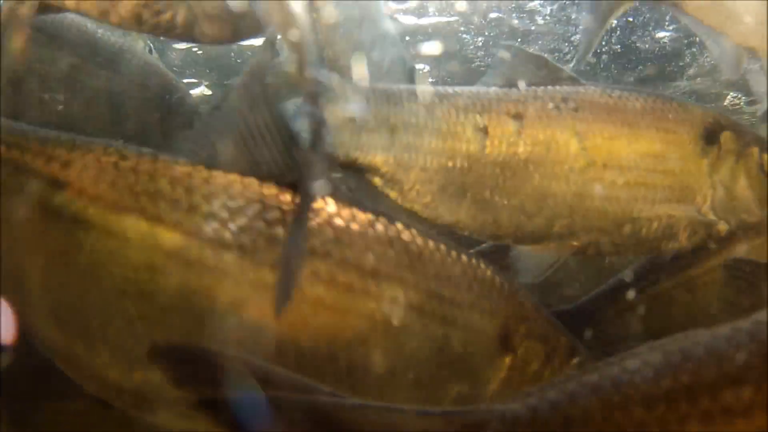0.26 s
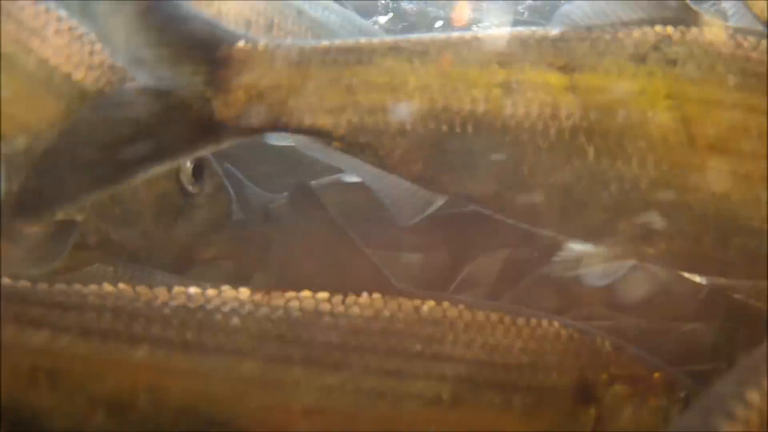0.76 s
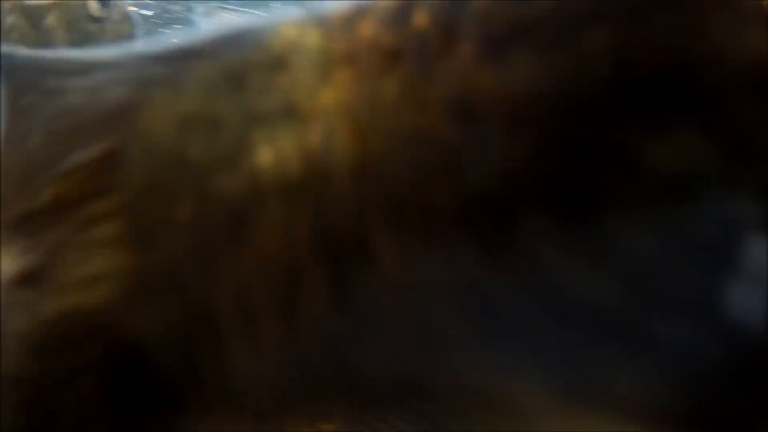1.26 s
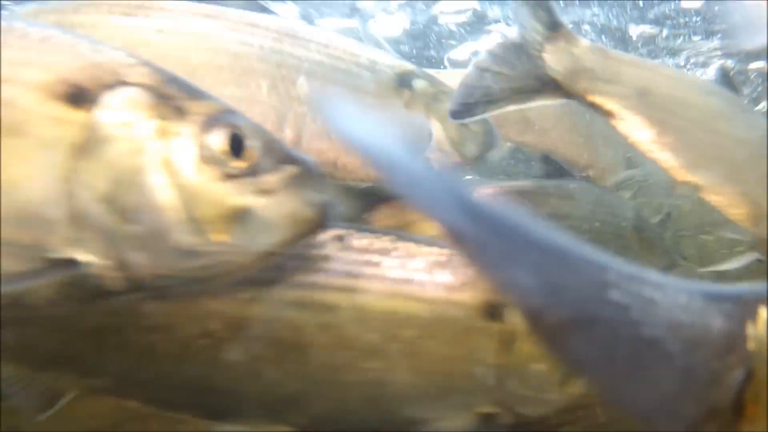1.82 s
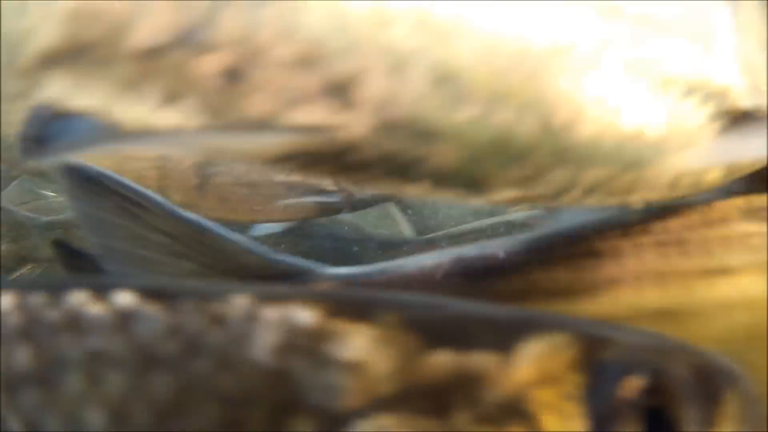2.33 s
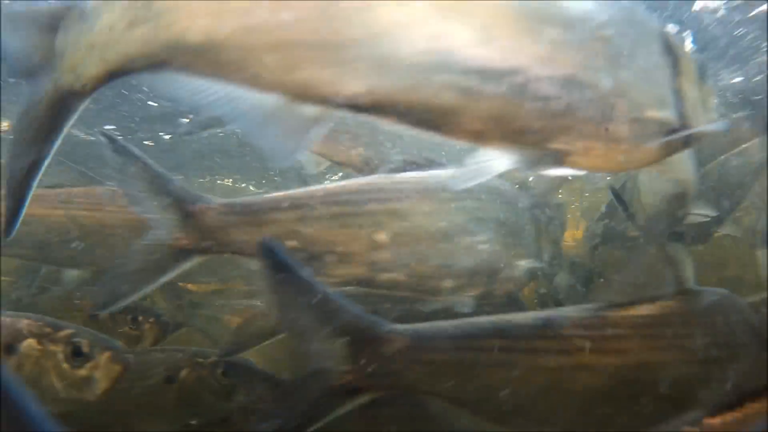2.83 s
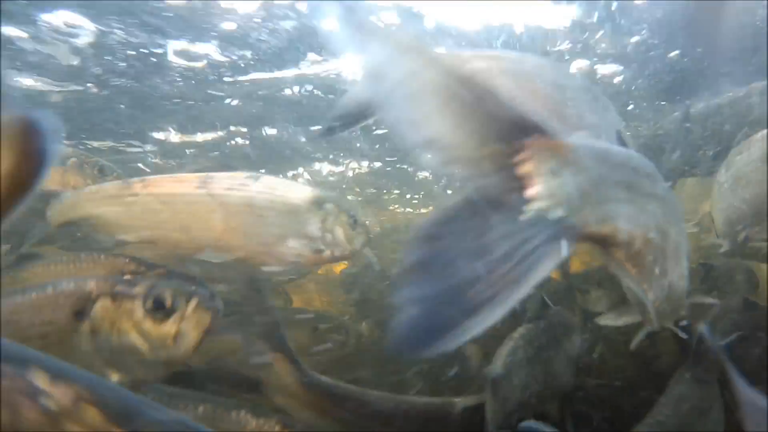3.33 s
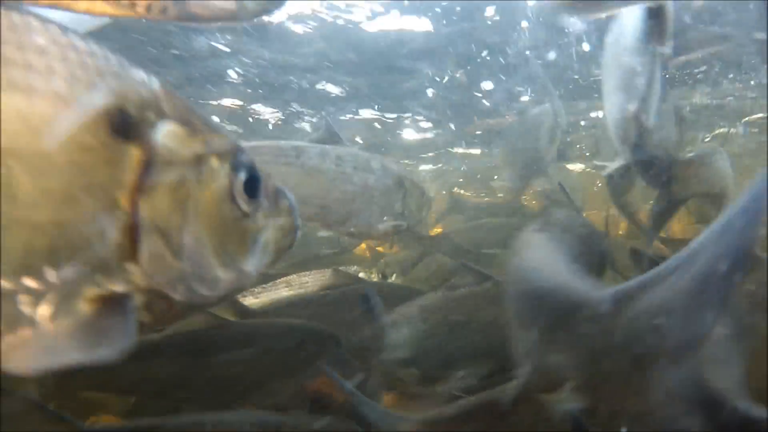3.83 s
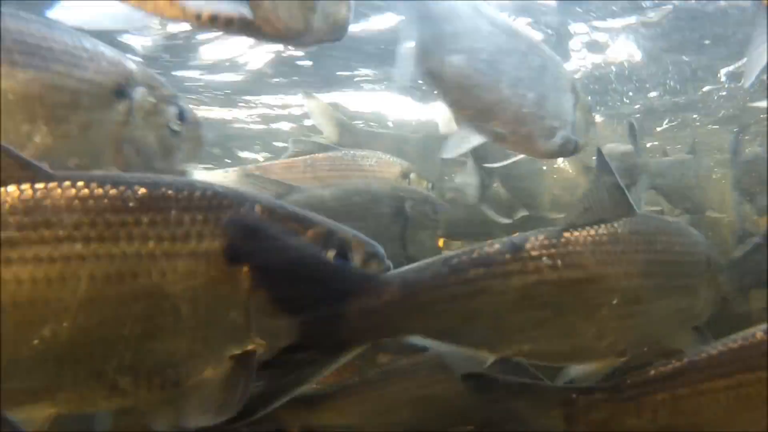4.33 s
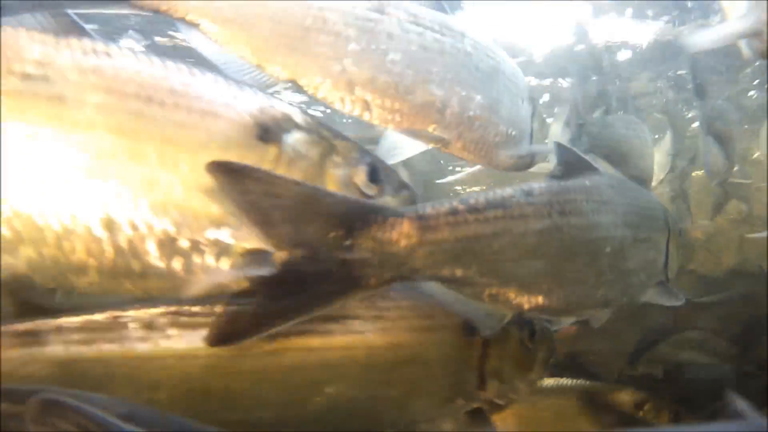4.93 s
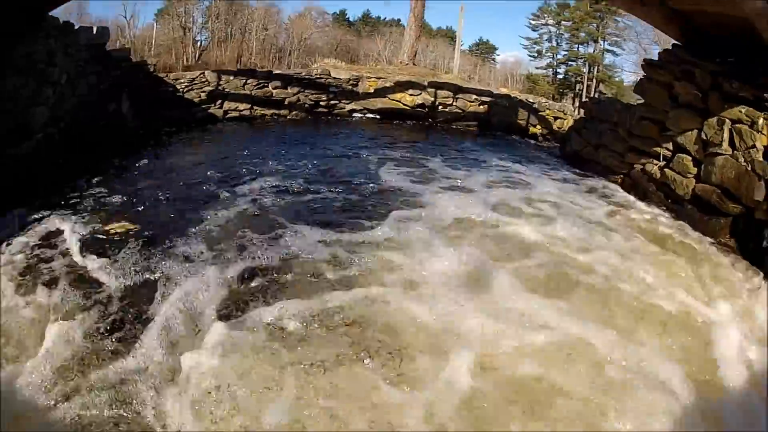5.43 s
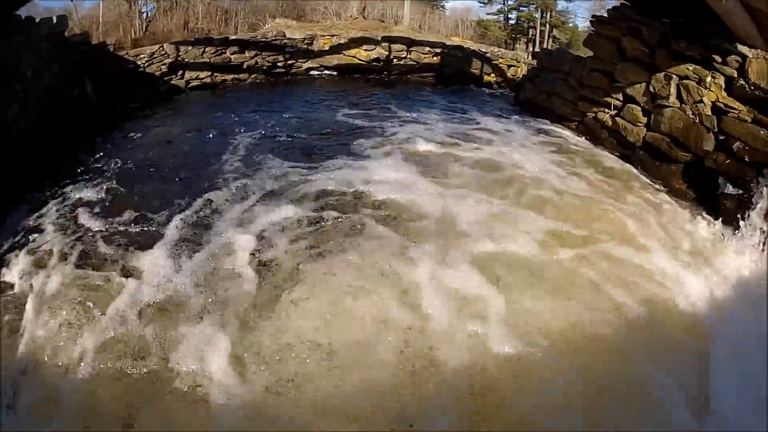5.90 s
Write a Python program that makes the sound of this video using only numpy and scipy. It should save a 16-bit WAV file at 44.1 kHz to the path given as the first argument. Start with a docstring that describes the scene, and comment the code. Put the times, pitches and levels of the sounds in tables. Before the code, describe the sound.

Close, boxy underwater sound: a sharp opening clunk, a pause, then clusters of overloaded knocks, raspy scrapes and deep mount thumps as fish crowd the microphone. The blows thin out into softer rubs, then very quiet dull flow with small rising bubble pops. Suddenly the sound opens to bright, fluttering, foamy water roar with slaps and light low buffeting.

```python
"""In a river, then above a weir: a sealed housing with a microphone inside sits in a dense run of fish.
Muffled current and bubble pops: filtered noise and gliding sines. Shoved mount: low modes and rumble.
Bodies scrape (rubbing noise, dense clicks) and knock (pressure pulses, wall ring, cracks) until it clips;
short high tones accompany these contacts.
The scene then changes to the air above the weir: flickering white-water noise, splashes and buffeting.
"""
import sys
import numpy as np
from scipy import signal
from scipy.fft import rfft, irfft
from scipy.io import wavfile
from scipy.ndimage import uniform_filter1d

SR = 44100
rng = np.random.default_rng(int(sys.argv[2]) if len(sys.argv) > 2 else 0)


def wav_record(signal):
    """Record a signal, one row per channel, as 16-bit PCM in the file named by sys.argv[1]."""
    frames = np.transpose(np.atleast_2d(signal))
    bounded = np.clip(frames, -1, 1)
    # unit amplitude maps onto the largest positive 16-bit level
    quanta = np.round(bounded * 32767).astype(np.int16)
    wavfile.write(sys.argv[1], SR, quanta)


N = 271656
TIME = np.arange(N) / SR
CUT_S = 5.216  # water to air


def undb(db):
    """Decibels to gain."""
    return 10 ** (np.asarray(db) / 20)


def unit(x):
    """Scale to rms 1."""
    return x / np.sqrt(np.mean(x ** 2) + 1e-18)


def add(out, start_s, x):
    """Mix x into out from start_s."""
    i = max(int(start_s * SR), 0)
    out[i:i + len(x)] += x[:N - i]


def colour(x, points, peaks=()):
    """Minimum-phase filter: (Hz, dB) outline plus resonances; keeps the power of white noise."""
    hz = np.arange(4097) * SR / 8192
    at_hz, at_db = np.transpose(points)
    db = np.interp(np.log(hz + 1), np.log(at_hz), at_db)
    for centre_hz, width_hz, lift_db in peaks:
        db = db + lift_db / (1 + (2 * (hz - centre_hz) / width_hz) ** 2)
    # fold the cepstrum to make the response causal
    cepstrum = irfft(np.log(undb(db)))
    cepstrum[1:4096] *= 2
    cepstrum[4097:] = 0
    response = irfft(np.exp(rfft(cepstrum)))
    return signal.fftconvolve(x, response / np.linalg.norm(response))[:len(x)]


def notch(x, hz, width_hz):
    """Remove one narrow band."""
    return signal.lfilter(*signal.iirnotch(hz, hz / width_hz, fs=SR), x)


def lowpass(x, hz, order):
    """Butterworth low-pass."""
    return signal.lfilter(*signal.butter(order, hz, fs=SR), x)


def fade(t, t60_s):
    """Exponential decay, 60 dB down after t60_s."""
    return np.exp(-np.log(1000) * t / t60_s)


def swell(start_s, rise_s, hold_s, t60_s):
    """Envelope: rises from start_s, starts to die away hold_s after start_s."""
    rise = np.clip((TIME - start_s) / rise_s, 0, 1)
    return rise * fade(np.maximum(TIME - start_s - hold_s, 0), t60_s)


def slide_pressure(length_s):
    """Contact envelope: builds fast, eases off."""
    return np.sin(np.pi * np.sqrt(np.linspace(0, 1, int(length_s * SR))))


def ring(hz, t60_s, glide=0):
    """One decaying sine, its pitch rising by the share glide over t60_s."""
    t = TIME[:int(t60_s * SR)]
    cycles = hz * t * (1 + glide * t / t60_s / 2)
    return np.sin(2 * np.pi * cycles) * fade(t, t60_s)


def walk(rate_hz):
    """Random levels held 1 / rate_hz and smoothed twice, rms 1."""
    k = int(SR / rate_hz)
    steps = np.repeat(rng.standard_normal(N // k + 1), k)
    return unit(uniform_filter1d(uniform_filter1d(steps, k), k)[:N])


def grains(rate_hz, spread_db):
    """Random clicks, rms 1; spread_db makes a few much larger than the rest."""
    hits = rng.random(N) < rate_hz / SR
    size_db = spread_db * np.minimum(rng.exponential(size=N), 4)
    return unit(hits * rng.standard_normal(N) * undb(size_db))


def churn(flicker_db, rate_hz):
    """Flat turbulent noise, rms 1, whose octaves swell and sink on their own."""
    spectrum = rfft(rng.standard_normal(N))
    hz = np.arange(N // 2 + 1) * SR / N
    octave = np.floor(np.log2(np.maximum(hz, 64)))
    out = np.zeros(N)
    for k in np.unique(octave):
        out += irfft(spectrum * (octave == k), N) * undb(flicker_db * walk(rate_hz))
    return unit(out)


def rumble(points):
    """Coloured low noise with its level evened out to rms 1."""
    x = colour(rng.standard_normal(N), points)
    return x / np.sqrt(uniform_filter1d(x ** 2, SR // 30) + 1e-12)


# bubbles popping nearby: start_s, level_db, start_pitch_hz
BUBBLE_POPS = [(1.424, -48, 1184), (3.087, -50, 844), (3.453, -51.5, 1103), (3.842, -46, 1172),
               (4.182, -50, 1995), (4.27, -55, 2700), (4.327, -43.5, 702), (4.331, -48.5, 2200),
               (5.18, -51, 3270)]
# current outline: freq_hz, relative_db_per_hz
CURRENT_SPECTRUM = [(15, -34.5), (25, -3.5), (87, -2), (114, -4), (180, -4.5), (384, -19), (659, -24.5),
                    (1020, -30.5), (2220, -28), (2480, -32.5), (5000, -35), (6050, -39), (8360, -38),
                    (14400, -45.5), (16000, -57)]
CURRENT_DB = -53


def current(bubble_t60_s=0.02, froth_gain=0.37):
    """Muffled turbulent flow with faint fizz; bubble pops are short sines gliding up."""
    flow = churn(flicker_db=-0.98, rate_hz=20) + undb(-9.5) * grains(rate_hz=250, spread_db=3)
    # centre_hz, width_hz, lift_db
    peaks = [(675.0, 160, 9.3), (2200, 270, 3.06), (3347, 510, 4.7)]
    out = undb(CURRENT_DB) * unit(colour(flow, CURRENT_SPECTRUM, peaks))
    for start_s, level_db, pitch_hz in BUBBLE_POPS:
        add(out, start_s, undb(level_db) * ring(pitch_hz, bubble_t60_s, glide=0.081))
        # each pop sheds four bubbles, smaller or larger
        for late, size in rng.random((4, 2)):
            shed = ring(pitch_hz * 2 ** (1.5 * size - 0.5), bubble_t60_s / 2)
            add(out, start_s + 0.011 * late, froth_gain * undb(level_db) * shed)
    return out


# air resonances in the housing: centre_hz, width_hz, lift_db
CAVITY_MODES = [(885, 120, 7), (1330, 190, -0.5), (2170, 610, 7), (3300, 700, 3.5), (8620, 670, 5)]
# rush outline: freq_hz, relative_db_per_hz
RUSH_SPECTRUM = [(60, -10), (160, -11), (290, -1), (410, -5), (600, -13), (900, -5), (2650, -10.5),
                 (3480, -5), (5300, -13.3), (8660, -14), (11000, -19), (11900, -43), (13500, -19),
                 (15500, -19)]
# water slapping down at the weir foot: start_s, length_s, slap_db, buffet_db
SPLASH_EVENTS = [(5.367, 0.02, -41, -67), (5.402, 0.094, -33.5, -35), (5.782, 0.067, -33.5, -49)]
# splash outline: freq_hz, relative_db_per_hz
SPLASH_SPECTRUM = [(100, -19), (300, 7), (600, -1), (1400, 4.5), (3000, -12), (8000, -26), (16000, -12)]
# low buffeting outline: freq_hz, relative_db_per_hz
BUFFET_SPECTRUM = [(20, -11), (50, -1.5), (85, 2), (140, -9), (250, -22), (500, -63)]
RUSH_DB, RUSH_START_DB, RUSH_RISE_S = -35.5, -3.5, 0.14  # start is relative to the steady rush
BUFFET_DB, GUST_DB, GUSTS_HZ = -49, 0.5, 10
SPRAY_DB, SURGE_RISE_S, SURGE_T60_S = -12, 0.016, 0.19


def weir():
    """Bursting bubbles rush as noise; splashes add spray, clicks and surges of low mount buffeting."""
    start_share = np.clip(1 - (TIME - CUT_S) / RUSH_RISE_S, 0, 1)
    flow = undb(RUSH_DB + RUSH_START_DB * start_share)
    heave = undb(BUFFET_DB + GUST_DB * walk(GUSTS_HZ)) * (flow / undb(RUSH_DB)) ** 2
    slaps = np.zeros(N)
    for start_s, length_s, slap_db, buffet_db in SPLASH_EVENTS:
        add(slaps, start_s, undb(slap_db) * slide_pressure(length_s))
        heave += undb(buffet_db) * swell(start_s, SURGE_RISE_S, length_s, SURGE_T60_S)
    foam = churn(flicker_db=1.45, rate_hz=18) + undb(-5.0) * grains(rate_hz=2300, spread_db=2.5)
    rush = unit(colour(foam, RUSH_SPECTRUM, CAVITY_MODES)) * (flow + undb(SPRAY_DB) * slaps)
    splashes = colour(slaps * grains(rate_hz=1700, spread_db=0), SPLASH_SPECTRUM, CAVITY_MODES)
    return rush + splashes + rumble(BUFFET_SPECTRUM) * heave


# passing bodies shoving the mount: start_s, level_db
MOUNT_SHOVES = [(0.058, -42.5), (0.45, -35.5), (0.8, -36.5), (1.308, -27.5), (1.64, -35.5), (2.26, -43.5)]
# mount resonances: freq_hz, relative_db, t60_s
MOUNT_RESONANCES = [(48.37, -1, 1.3), (84, 5, 0.5), (122, -0.5, 0.35)]
# shudder outline: freq_hz, relative_db_per_hz
SWAY_SPECTRUM = [(20, -10), (50, -2.5), (85, -1.5), (130, -13), (220, -25), (500, -67.5)]
SHOVE_RISE_S, SHOVE_T60_S = 0.025, 0.98


def sway(shudder_db=-2):
    """Each shove excites decaying mount modes and a low noisy shudder."""
    shudder, modes = np.zeros((2, N))
    for start_s, level_db in MOUNT_SHOVES:
        shudder += undb(level_db) * swell(start_s, SHOVE_RISE_S, SHOVE_RISE_S, SHOVE_T60_S)
        for hz, mode_db, t60_s in MOUNT_RESONANCES:
            tone = np.sin(2 * np.pi * hz * (TIME - start_s))
            modes += undb(level_db + mode_db) * tone * swell(start_s, SHOVE_RISE_S, SHOVE_RISE_S, t60_s)
    return rumble(SWAY_SPECTRUM) * shudder * undb(shudder_db) + modes


# thin high tones near 11-13 kHz that accompany contacts: freq_hz, relative_db, t60_s
HIGH_TONES = [(11380, -0.5, .028), (12200, -1.5, 0.012), (12240, 2, 0.019), (12900, -2, 0.03)]


def high_tones(x):
    """Short high tones that follow x: x convolved with decaying sines."""
    return sum(undb(db) * signal.fftconvolve(x, ring(hz, t60_s))[:N] for hz, db, t60_s in HIGH_TONES)


# bodies, scales and fins sliding over the housing: start_s, length_s, rub_db, wall_ring_db, rasp_db
SCRAPE_EVENTS = [(0.171, 0.2, -40.5, -49.5, -61.5), (0.449, 0.045, -32, -59, -59),
                 (0.504, 0.17, -42, -64, -60.5), (0.669, 0.0092, -42, -29, -31.5),
                 (0.755, 0.023, -15, -26, -39), (1.187, 0.19, -60, -50.5, -67.5),
                 (1.243, 0.023, -51, -29.5, -52.5), (1.313, 0.0031, -35, -38.5, -51.5),
                 (1.324, 0.04, -25, -37.5, -41.5), (1.37, 0.012, -30, -55, -42.5),
                 (1.526, 0.029, -33, -38.5, -39.5), (1.566, 0.014, -37, -33.5, -40),
                 (1.646, 0.034, -34, -28.5, -32), (2.239, 0.11, -32, -52, -81),
                 (2.371, 0.033, -43, -72, -76), (2.57, 0.05, -49, -54.5, -74),
                 (2.599, 0.038, -42, -46, -56)]
# rub outline: freq_hz, relative_db_per_hz
RUB_SPECTRUM = [(25, -2), (65, 2.5), (125, -1), (230, -9.5), (500, -21), (1000, -37), (3000, -62)]
# contact crack and rasp outline: freq_hz, relative_db_per_hz
CRACK_SPECTRUM = [(300, -15), (1200, 8), (2200, 4), (3700, -1), (5000, -6.5), (7500, -11), (10000, -6.5),
                  (14500, -11), (16000, -16)]


def scrapes(wall_hz=705, wall_t60_s=0.021, wall_top_hz=1700, tone_db=-42):
    """Soft flanks rub with a rumble; scales catch and slip in dense clicks that rasp and ring the wall."""
    rub, wall, rasp = np.zeros((3, N))
    for start_s, length_s, rub_db, ring_db, rasp_db in SCRAPE_EVENTS:
        pressure = slide_pressure(length_s)
        add(rub, start_s, undb(rub_db) * pressure)
        add(wall, start_s, undb(ring_db) * pressure)
        add(rasp, start_s, undb(rasp_db) * pressure)
    slips = grains(rate_hz=5800, spread_db=2.0)
    mode = ring(wall_hz, wall_t60_s)  # damped by the body lying against it
    ringing = signal.fftconvolve(slips * wall, mode / np.linalg.norm(mode))[:N]
    body = lowpass(rub * rumble(RUB_SPECTRUM) + ringing, wall_top_hz, order=2)
    rasping = colour(slips * rasp, CRACK_SPECTRUM, CAVITY_MODES)
    return body + rasping + high_tones(slips * wall * undb(tone_db))


# fish striking the housing: start_s, push_db, contact_ms, wall_ring_db, wall_ring_hz (unsagged), crack_db
KNOCK_EVENTS = [(0.0511, 13, 2.9, 3, 907, -14), (0.069, 1, 3.4, -18.5, 990, -36),
                (0.0829, 0.5, 2.85, -21, 990, -46), (0.1, 3, 3.4, -18.5, 950, -37.5),
                (0.1183, 1, 3.3, -27, 990, -50), (0.1836, -13.5, 4.4, -41, 780, -56),
                (0.4368, -1.5, 3.3, -22, 854, -32), (0.4566, -6, 4.45, -42, 640, -48),
                (0.646, -26, 2.3, -26.5, 725, -38.5), (0.669, -18, 4.7, -11, 860, -27),
                (0.7414, 10, 4.78, -14, 900, -16.5), (0.7621, -7.5, 2.3, -11.5, 885, -30),
                (0.7799, 6, 3.24, -9, 775, -27), (0.8075, 4.5, 3.54, -16.5, 890, -25.5),
                (0.8271, 11, 3.85, -3, 860, -24), (0.8415, 11, 3.9, -3.5, 887, -18.5),
                (0.8557, 0.5, 5.3, -19.5, 905, -32), (0.872, 0, 5.35, -19.5, 895, -29.5),
                (0.9036, 7.5, 2.66, -7, 854, -29), (0.9917, 6.5, 2.92, 10, 810, -7),
                (1.0116, -14.5, 3.1, -0.8, 760, -20.5), (1.0306, -21, 2.2, -7.5, 750, -28.5),
                (1.2793, 8, 3, 3.5, 915, -11.5), (1.3257, -4, 2.4, -8.5, 940, -20.5),
                (1.3813, -2.5, 2.04, 4.5, 720, -15.5), (1.5599, -2.5, 3.45, -19.5, 980, -26),
                (1.6258, 9, 4, -3.5, 817, -10.5), (1.6486, 11, 2.66, -3, 698, -3),
                (2.241, -3, 6.8, -11, 680, -78), (2.35, -42, 1.7, -18, 816, -54),
                (2.608, -28.5, 1.43, -54, 700, -54)]
# wall resonances: multiple_of_ring_hz, relative_db, t60_s
WALL_RESONANCES = [(1, -3, 0.02), (0.95, -20.5, 0.047)]
WALL_SAG_MAX, LIFT_OFF_S = 0.2, 0.0043  # share of pitch; time constant


def knocks(leak_hz=119, leak_q=0.71, soft_hz=950, wall_top_hz=1650, rise_share=0.04,
           crack_t60_s=0.02, crack_rise_s=0.00024, tone_push_db=-41, tone_ring_db=-33):
    """Blows squeeze the housing, ring the wall, add short high tones, crack; hard ones sag the pitch."""
    pushes, walls, cracks, jolts = np.zeros((4, N))
    t = TIME[:SR // 20]
    for start_s, push_db, contact_ms, ring_db, ring_hz, crack_db in KNOCK_EVENTS:
        contact = t / (contact_ms / 1000)
        push = np.sin(np.pi * np.minimum(contact, 1))
        # pitch recovers as the body lifts off
        sag = WALL_SAG_MAX * np.tanh(undb(ring_db)) * np.exp(-t / LIFT_OFF_S)
        cycles = np.cumsum(ring_hz * (1 - sag)) / SR
        wall = np.zeros(len(t))
        for multiple, db, t60_s in WALL_RESONANCES:
            wall += undb(db) * np.sin(2 * np.pi * multiple * cycles) * fade(t, t60_s)
        wall *= 1 - np.exp(-(contact / rise_share) ** 2)  # longer contact, gentler onset
        grit = rng.standard_normal(len(t)) * fade(t, crack_t60_s) * (1 - np.exp(-t / crack_rise_s))
        jolt = undb(push_db + tone_push_db) + undb(ring_db + tone_ring_db)
        add(pushes, start_s, -undb(push_db) * push)
        add(walls, start_s, undb(ring_db) * wall)
        add(cracks, start_s, undb(crack_db) * grit)
        add(jolts, start_s, jolt * grit / np.linalg.norm(grit))
    # steady pressure leaks away: dip, rebound, slow return
    w = 2 * np.pi * leak_hz / SR
    thuds = signal.lfilter(*signal.bilinear([1, 0, 0], [1, w / leak_q, w ** 2], 1), pushes)
    body = lowpass(lowpass(thuds, soft_hz, order=1) + walls, wall_top_hz, order=3)
    return body + colour(cracks, CRACK_SPECTRUM, CAVITY_MODES) + high_tones(jolts)


# band the housing nearly blocks: centre_hz, width_hz
HOUSING_DEAD_BAND = (6020, 620)
# band removed from the weir sound: centre_hz, width_hz
WEIR_DEAD_BAND = (11700, 1400)


def scene():
    """Under water, then abruptly in air; all heard through the housing."""
    in_air = np.clip((TIME - CUT_S) / 0.006, 0, 1)
    water = current() + sway() + scrapes() + knocks()
    air = notch(weir(), *WEIR_DEAD_BAND)
    sound = (1 - in_air) * water + in_air * air
    return notch(notch(sound, *HOUSING_DEAD_BAND), *HOUSING_DEAD_BAND)[None]


TOP_HZ = 15600


def record(dry):
    """Overload clips flat at full scale; a steep low-pass then cuts the top."""
    clipped = np.clip(dry, -1, 1)
    top_cut = signal.ellip(8, 0.05, 50, TOP_HZ, fs=SR, output="sos")
    return signal.sosfiltfilt(top_cut, clipped)


dry = scene()
out = record(dry)
wav_record(out)
```